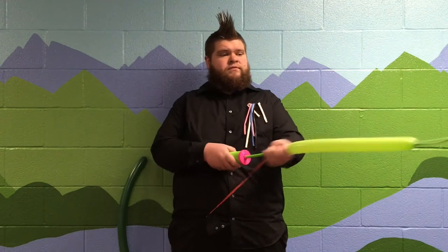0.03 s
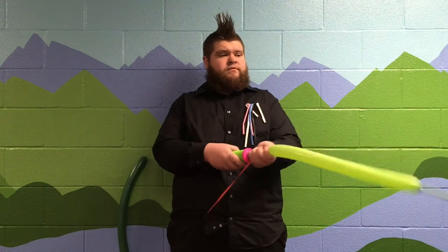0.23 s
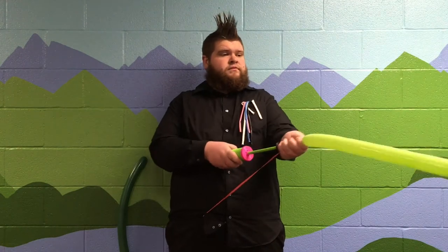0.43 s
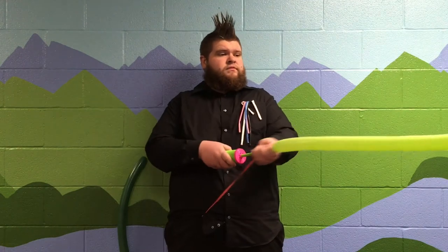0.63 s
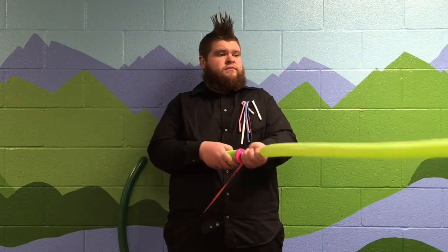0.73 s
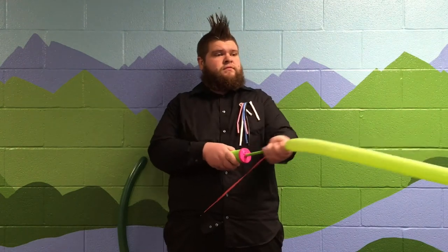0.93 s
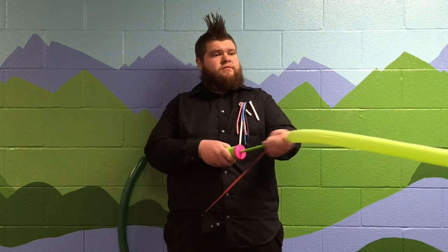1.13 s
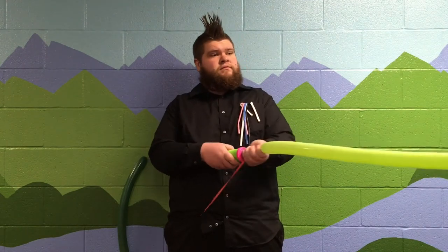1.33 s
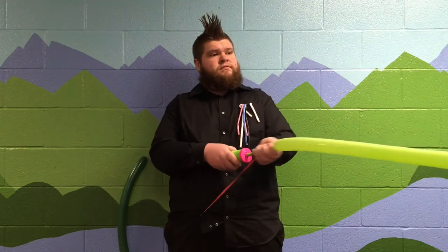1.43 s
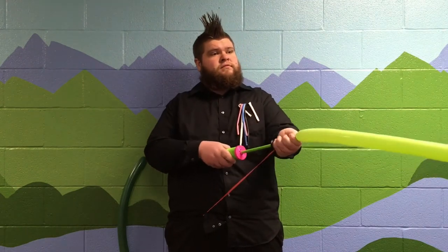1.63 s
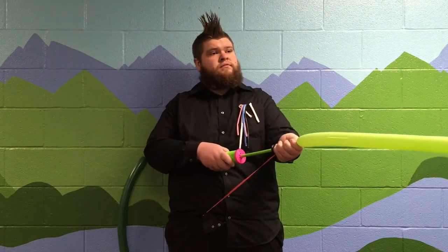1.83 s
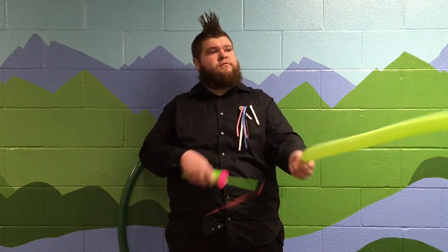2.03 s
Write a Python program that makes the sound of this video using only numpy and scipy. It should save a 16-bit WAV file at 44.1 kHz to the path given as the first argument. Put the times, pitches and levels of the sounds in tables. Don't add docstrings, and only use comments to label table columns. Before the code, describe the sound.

A plastic hand pump inflates a long balloon: bright hissing pushes with a thin whistle, softer indrawn pulls, hollow knocks between, finally the neck pops off with a puff. Hard-walled room, fairly close microphone, low ventilation.

```python
import sys
import numpy as np
from scipy import signal
from scipy.fft import rfft, irfft, next_fast_len
from scipy.io import wavfile
from scipy.ndimage import map_coordinates

SR = 44100
rng = np.random.default_rng(int(sys.argv[2]) if len(sys.argv) > 2 else 0)


def generate_wav(signal):
    frames = np.transpose(np.atleast_2d(signal))
    scaled = np.clip(frames, -1, 1) * 32767
    pcm = np.round(scaled).astype(np.int16)
    wavfile.write(sys.argv[1], SR, pcm)


def elevation(decibels):
    levels = np.asarray(decibels, float)
    return 10 ** (levels / 20)


N = 92301
VALVE_S = 0.012
STROKE_BLEED = 254


def unit(x):
    return x / np.sqrt(np.mean(x ** 2) + 1e-20)


def along(points, hz):
    f, v = np.transpose(points)
    return np.interp(np.log(hz + 1), np.log(f + 1), v)


def filtered(x, response):
    m = next_fast_len(N + SR // 2)
    return irfft(rfft(x, m) * response(np.fft.rfftfreq(m, 1 / SR)), m)[..., :N]


def peak(f, hz, width):
    return 1j * f * width / (hz * hz - f * f + 1j * f * width)


def wobble(rate):
    knots = rng.standard_normal(int(N * rate / SR) + 4)
    return map_coordinates(knots, [np.arange(N) * rate / SR])


def air(response, flutter_db):
    noise = unit(filtered(rng.standard_normal(N), response))
    return noise * elevation(flutter_db * (wobble(39.11) + wobble(250)))


def strokes(rows, start_db, end_db, bleed_db, grows=1, bend=1.0, rise_s=VALVE_S):
    t, gain = np.arange(N) / SR, np.zeros(N)
    for start, top, end, db in rows:
        swell = start_db * abs((t - top) / (top - start)) ** bend
        sag = end_db * np.clip((t - top) / (end - top), 0, 1) ** bend
        speed_db = np.where(t < top, swell, sag)
        opening = np.clip((t - start) / rise_s, 0, 1) ** 2
        gain += opening * elevation(db + grows * speed_db - bleed_db * np.maximum(t - end, 0))
    return gain


def push(grows):
    # [valve opens t/s, fastest t/s, piston stops t/s, level/dB]
    pushes = [
        (.07, .15, 0.2, -30),
        (.614, .735, 0.78, -32.5),
        (1.188, 1.3, 1.329, -31.5),
    ]
    return strokes(pushes, -3.5, -0.5, STROKE_BLEED, grows, bend=2.05)


def pull(grows):
    # [start t/s, fastest t/s, end t/s, level/dB]
    pulls = [
        (-.2, -.12, 0.0083, -43),
        (.35, .44, 0.49, -33.5),
        (.92, 1.01, 1.079, -35.5),
        (1.483, 1.562, 1.604, -32),
    ]
    return strokes(pulls, -21, -11.5, 362, grows, bend=1.93)


def nozzle_jet():
    # [f/Hz, level/dB per Hz]
    jet_colour = [(1760, -50), (3000, -5), (4940, -12), (5950, -5), (8250, -9), (14400, 4.5), (15700, 3)]
    return push(0.82) * air(lambda f: elevation(along(jet_colour, f)), flutter_db=0.55)


def low_rush():
    # [f/Hz, level/dB per Hz]
    rush_colour = [(180, -44), (300, -3.5), (801, -16), (1190, -10), (1300, -13), (1460, -8), (2540, -18),
                   (9000, -7), (11700, -36), (19800, -120)]
    return elevation(-11.5) * push(7.1) * air(lambda f: elevation(along(rush_colour, f)), flutter_db=0.7)


def pull_draw():
    # [f/Hz, level/dB per Hz]
    draw_colour = [(710, -30), (1200, 1.5), (1990, -17.5), (2470, -4), (4050, -7), (4970, -13.5),
                   (5900, -13.5), (14600, -1.5), (15700, -12.5)]
    # [f/Hz, width/Hz, boost/dB]
    pipe_modes = [(2570, 110, -10.5), (4000, 630, 5), (5990, 1630, 11.5), (8100, 450, 8.5),
                  (9830, 300, 8.5), (12550, 500, 8), (14840, 640, 8.5)]

    def response(f):
        pipe_db = sum(db * abs(peak(f, hz, width)) ** 2 for hz, width, db in pipe_modes)
        return elevation(along(draw_colour, f) + pipe_db)

    return pull(1) * air(response, flutter_db=0.5)


def nozzle_whistle():
    # [f/Hz, width/Hz, level over the jet/dB]
    cavity = [(1280, 29, -18.5), (2524, 250, -15.5)]
    drive = push(5.3) + elevation(2.5) * pull(0.36)
    whistle = 0
    for hz, width, db in cavity:
        ring = lambda f: peak(f, hz, width)
        noise = rng.standard_normal(N)
        steady_level = np.std(filtered(noise, ring))
        whistle = whistle + elevation(db) / steady_level * filtered(noise * drive, ring)
    return whistle


def cavity_tone():
    # [start t/s, peak t/s, end t/s, level/dB]
    tones = [(.09, .175, 0.19, -43), (.25, .272, 0.5, -61), (.43, .48, 0.49, -45), (.51, .555, 0.51, -49.5),
             (.65, .735, 0.743, -37), (.79, .83, 0.97, -53.5), (.98, 1.03, 1, -49.5),
             (1.225, 1.305, 1.325, -38.5), (1.36, 1.39, 1.35, -56), (1.52, 1.6, 1.554, -43),
             (1.63, 1.67, 1.676, -56.5)]
    pitch_hz = 1317 + 3.59 * wobble(24.9)
    phase = 2 * np.pi * np.cumsum(pitch_hz) / SR
    gain = strokes(tones, -22.5, -7.5, STROKE_BLEED) * elevation(1.74 * wobble(31.35))
    return gain * np.sqrt(2) * np.sin(phase)


def escaping(rows, colour, edge_db, rise_s=VALVE_S):
    gain = strokes(rows, edge_db, edge_db, bleed_db=600, rise_s=rise_s)
    return gain * air(lambda f: elevation(along(colour, f)), flutter_db=1.0)


def barrel_rattle():
    # [start t/s, peak t/s, end t/s, level/dB]
    rattles = [
        (.351, .358, 0.35, -34),
        (.922, .93, .945, -31.5),
        (1.484, 1.492, 1.508, -31.5),
    ]
    # [f/Hz, level/dB per Hz]
    rattle_colour = [(450, -25), (750, -11), (1000, 5.5), (1500, -6.5), (2100, -18.5), (3800, -11),
                     (5000, -40)]
    return escaping(rattles, rattle_colour, -8, rise_s=0.002)


def valve_seeps():
    # [start t/s, peak t/s, end t/s, level/dB]
    seeps = [
        (.005, .045, 0.067, -45),
        (.558, .595, 0.62, -45.5),
        (1.138, 1.175, 1.22, -45),
        (1.93, 1.975, 2.0, -53),
        (2.025, 2.055, 1.53, -53),
    ]
    # [f/Hz, level/dB per Hz]
    seep_colour = [(1000, -5), (1800, -3.5), (4500, -13), (6500, -8.5), (10500, -8), (12500, -2),
                   (14500, -3), (15700, -4.5)]
    return escaping(seeps, seep_colour, -8)


def neck_pinch():
    # [start t/s, peak t/s, end t/s, level/dB]
    squeeze = [(1.808, 1.82, 1.83, -60)]
    # [f/Hz, level/dB per Hz]
    pinch_colour = [(6000, -25), (9000, -8), (12500, 0), (14000, -4), (15700, -12)]
    return escaping(squeeze, pinch_colour, -8, rise_s=0.002)


def neck_leak():
    # [start t/s, peak t/s, end t/s, level/dB]
    leaks = [(1.915, 1.975, 3.52, -53.5)]
    # [f/Hz, level/dB per Hz]
    leak_colour = [(350, -48), (600, -9), (1340, -8), (2290, -4), (3740, -3), (4290, -5), (15700, -5)]
    return escaping(leaks, leak_colour, -10)


def neck_puffs():
    # [start t/s, peak t/s, end t/s, level/dB]
    puffs = [
        (2.006, 2.013, 2.026, -33),
        (2.03, 2.046, 2.04, -52),
    ]
    # [f/Hz, level/dB per Hz]
    puff_colour = [(600, -38), (1150, -6), (1900, -23.5), (2450, 5), (3000, -4), (3650, 0), (5500, -5),
                   (7500, -18), (12000, -41)]
    return escaping(puffs, puff_colour, -10, rise_s=0.002)


def knocks(events, modes, trim_db, crack_db, rise_s, low_lag_s, wall_db, floor_db, rough, dull=0.34):
    ringing, crack, t = np.zeros(N + SR), np.zeros(N + SR), np.arange(SR // 14) / SR
    for s, event_db in events:
        at, db = round(s * SR), event_db + trim_db
        crack[at:][:len(t)] += elevation(db + crack_db - 60 * t / 0.0061) * rng.standard_normal(len(t))
        for hz, level, t60 in modes:
            u = np.maximum(t - low_lag_s * (hz < 1100), 0)
            tuned_hz = hz * (1 + rng.normal(0, 0.01))
            start_phase = rng.uniform(0, 2 * np.pi) * (hz > 3000)
            wander = rough * np.sqrt(hz / SR) * np.cumsum(rng.standard_normal(len(t)) * (u > 0))
            phase = 2 * np.pi * tuned_hz * u + start_phase + wander
            decay = elevation(db + level + rng.normal(0, 1.0) - 60 * u / t60)
            ringing[at:][:len(t)] -= decay * np.sin(phase) * (1 - np.exp(-u / rise_s))

    def late(f, level_db, delay_s):
        return elevation(level_db) * np.exp(-2j * np.pi * f * delay_s)

    def reflected(f):
        wall, side = late(f, wall_db, 0.00335), late(f, -14.5, 0.0097)
        floor = late(f, floor_db, 0.0165) / (1 + 1j * f / 2500)
        echo = 1.5 + (wall + side + floor) / (1 + .4j * f / 1000) ** dull
        return echo * (f / (f - 1j * 88)) ** 2

    soft_crack = filtered(crack[:N], lambda f: 1 / (1 + 1j * f / 7000))
    return filtered(ringing[:N] + soft_crack, reflected)


def piston_slams():
    # [t/s, peak level/dB]
    slams = [
        (.3449, -13),
        (.9158, -11.5),
        (1.4781, -11.5),
    ]
    # [f/Hz, level/dB, t60/s]
    slam_modes = [(352, -10.5, 0.0077), (710, 2.5, 0.006), (920, -21, 0.031), (1223, -17.5, 0.012),
                  (1435, -18, 0.024), (1598, -16.5, 0.019), (3770, -3.5, 0.003), (5870, -10, 0.0036),
                  (8300, -20, 0.0019), (13350, -20, 0.0038)]
    return knocks(slams, slam_modes, trim_db=2.5, crack_db=-9.5, rise_s=0.00034, low_lag_s=0.001572,
                  wall_db=-1.0, floor_db=-14, rough=0.04, dull=0.29)


def piston_stops():
    # [t/s, peak level/dB]
    stops = [
        (.2079, -21.5),
        (.7759, -22),
        (1.3444, -22),
    ]
    # [f/Hz, level/dB, t60/s]
    stop_modes = [(159, -7, 0.033), (640, -7.5, 0.016), (1454, -4.5, 0.0089), (2043, -5, 0.012),
                  (2606, 2.5, 0.0067), (3026, -6.5, 0.014), (3462, -7.5, 0.011), (6860, -10.5, 0.014)]
    return knocks(stops, stop_modes, trim_db=3, crack_db=-26, rise_s=0.0012, low_lag_s=0.001,
                  wall_db=-1.5, floor_db=-2, rough=0.83)


def valve_turns():
    # [t/s, peak level/dB]
    turns = [
        (.0288, -26),
        (.58, -22),
        (1.1567, -25),
    ]
    # [f/Hz, level/dB, t60/s]
    turn_modes = [(718, -1, 0.03), (1540, -19, 0.019), (2615, -9, 0.046), (3720, -18, .005),
                  (5860, -10, 0.013), (9300, -7, 0.0063), (11400, -7.5, .005), (12800, -8, .004),
                  (14700, -4, 0.0071)]
    return knocks(turns, turn_modes, trim_db=-1.5, crack_db=-4, rise_s=0.0001, low_lag_s=0.00072,
                  wall_db=-3.5, floor_db=-8, rough=0.14, dull=0.037)


def neck_pop():
    # [t/s, peak level/dB]
    pop = [(2.0058, -18.5)]
    # [f/Hz, level/dB, t60/s]
    neck_modes = [(770, -22, 0.011), (1160, -6.5, 0.014), (1620, -7, 0.0094), (2440, -1, 0.016),
                  (3023, -10, 0.014), (3643, -0.5, 0.015), (4280, -1.5, 0.011), (5260, -8, 0.013),
                  (6680, -15, .01), (8000, -11, .005), (10500, -28, 0.0032), (14600, -22, .004)]
    return knocks(pop, neck_modes, trim_db=-2.0, crack_db=-17, rise_s=0.00044, low_lag_s=0.00036,
                  wall_db=-4.5, floor_db=-10, rough=0.5, dull=0.3)


def rubber_slips():
    # [t/s, level/dB]
    slips = [
        (1.195, -49),
        (1.94, -36.5),
        (1.957, -39),
        (1.97, -41.5),
        (1.983, -50),
    ]
    # [f/Hz, level/dB, t60/s]
    slip_modes = [(720, -10.5, 0.033), (2520, -6, .006), (3840, -3, 0.0042), (5800, -8, 0.004),
                  (12900, -16, 0.0027)]
    return knocks(slips, slip_modes, trim_db=-4.5, crack_db=-14, rise_s=0.00024, low_lag_s=0.00022,
                  wall_db=-22, floor_db=-22, rough=0.4)


def lip_spits():
    # [t/s, level/dB]
    spits = [
        (1.744, -58),
        (1.805, -50),
        (1.812, -53),
        (2.0098, -36),
        (2.0158, -34),
        (2.0192, -31),
        (2.044, -37),
    ]
    # [f/Hz, level/dB, t60/s]
    spit_modes = [(7400, -14, 0.0013), (10500, -14, 0.0026), (13600, -8, .004), (15000, -7.5, .003)]
    return knocks(spits, spit_modes, trim_db=4, crack_db=-12, rise_s=0.0004, low_lag_s=0,
                  wall_db=-36.0, floor_db=-30, rough=0.3)


def small_ticks():
    # [t/s, level/dB]
    ticks = [
        (.366, -35),
        (.9352, -33),
        (1.499, -34),
        (2.012, -37),
        (2.039, -45),
        (2.08, -55),
    ]
    # [f/Hz, level/dB, t60/s]
    tick_modes = [(6400, 4.5, 0.0063), (8600, -8, 0.0027), (11300, -6, .003), (13200, -10, .003)]
    return knocks(ticks, tick_modes, trim_db=-5, crack_db=-14, rise_s=0.0003, low_lag_s=0,
                  wall_db=-12, floor_db=-30, rough=0.36)


def room(x):
    # [f/Hz, t60/s]
    room_decay = [(150, 0.89), (700, 0.47), (2000, 0.6), (6000, 0.54), (14000, 0.59)]
    # [f/Hz, level/dB]
    room_colour = [(300, -1), (1200, -0.5), (3000, -3), (4200, -2.5), (4900, -3.5), (6500, -6.5),
                   (10000, -11.5), (15000, -9.5)]
    wet, step, gap = np.zeros(N + 2 * SR), SR // 8, round(0.006 * SR)
    for i in range(0, N, step):
        hz, t, z = signal.stft(rng.standard_normal(SR // 2), SR, nperseg=256)
        decay = elevation(-60 * t / along(room_decay, hz)[:, None])
        tail = signal.istft(z * decay, SR, nperseg=256)[1]
        part = signal.fftconvolve(x[i:i + step], tail / np.linalg.norm(tail))
        wet[i + gap:][:len(part)] += part
    return filtered(wet[:N], lambda f: elevation(along(room_colour, f)))


def ventilation():
    # [f/Hz, level/dB per Hz]
    vent_colour = [(18, -37), (30, -10.5), (77, -2), (117, -13), (193, -12.5), (301, -18), (714, -33.5),
                   (1300, -41), (15700, -50)]
    # [f/Hz, width/Hz, level/dB]
    duct_modes = [(59.9, 30, -48), (163.6, 29, -55.5)]
    ducts = sum(elevation(db) * air(lambda f: peak(f, hz, width) ** 2, flutter_db=2.5)
                for hz, width, db in duct_modes)
    return elevation(-51.5) * air(lambda f: elevation(along(vent_colour, f)), flutter_db=-1.7) + ducts


def scene():
    airflow = nozzle_jet() + low_rush() + pull_draw() + nozzle_whistle() + cavity_tone()
    bursts = barrel_rattle() + valve_seeps() + neck_pinch() + neck_leak() + neck_puffs()
    plastic = piston_slams() + piston_stops() + valve_turns() + small_ticks()
    rubber = neck_pop() + rubber_slips() + lip_spits()
    pump = airflow + bursts + plastic + rubber
    return (pump + elevation(-7.5) * room(pump) + ventilation())[None]


def roll_off(x):
    return signal.sosfilt(signal.butter(12, 17010, fs=SR, output="sos"), x)


def record(dry):
    def passband(f):
        band = np.where(f < 15750, 1, elevation(-46) * (f < 17100))
        return band / np.sqrt(1 + (38 / (f + 1)) ** 8)

    return roll_off(filtered(dry, passband))


dry = scene()
out = record(dry)
generate_wav(out)
```